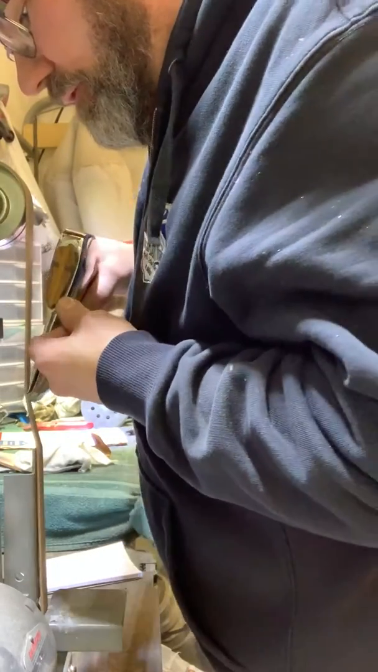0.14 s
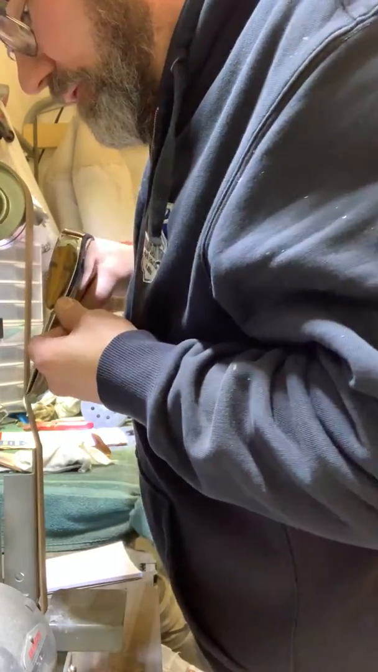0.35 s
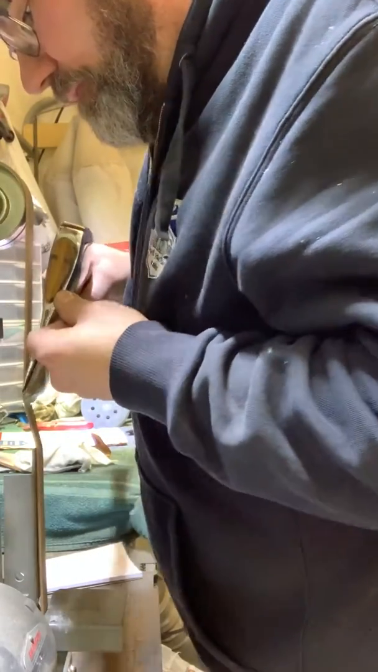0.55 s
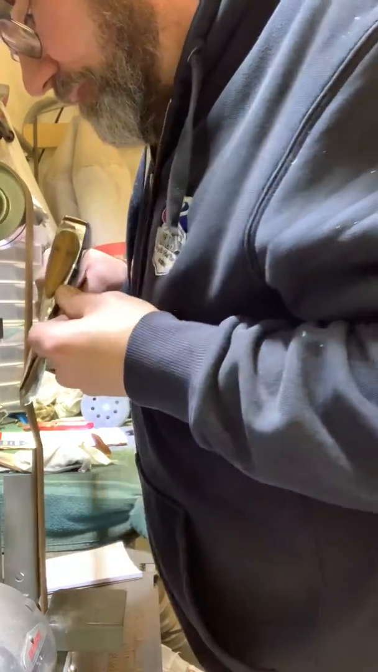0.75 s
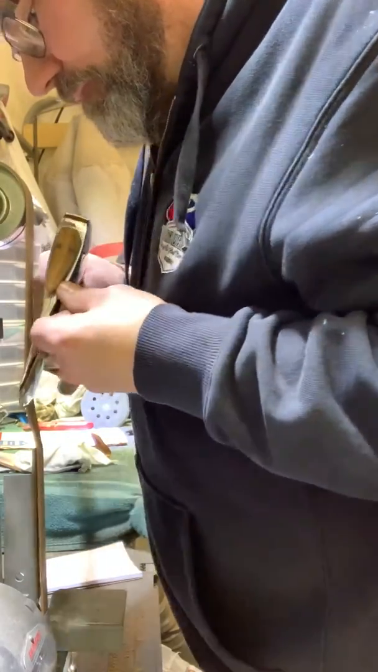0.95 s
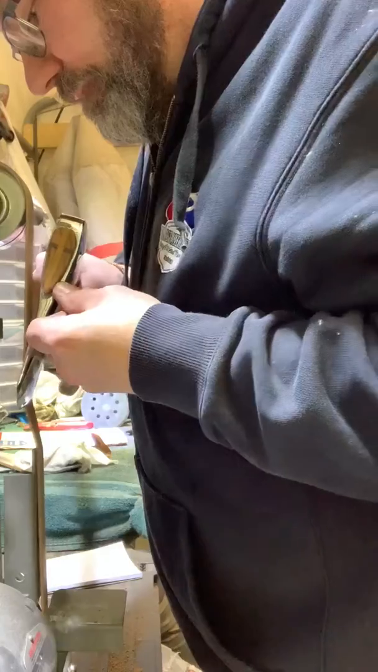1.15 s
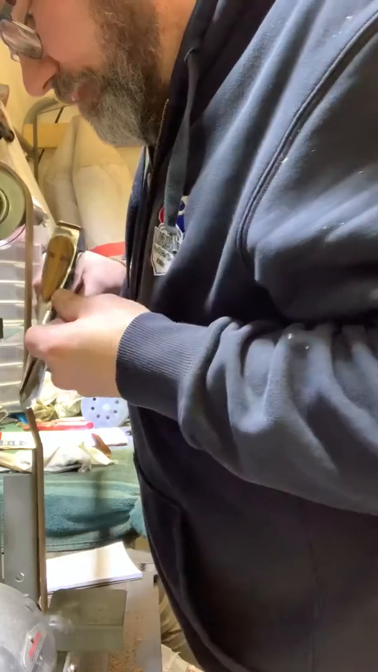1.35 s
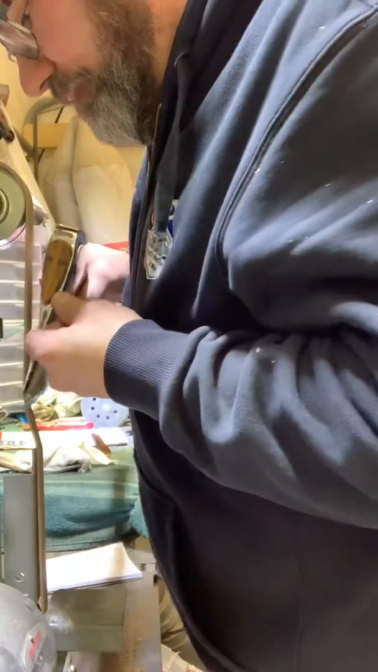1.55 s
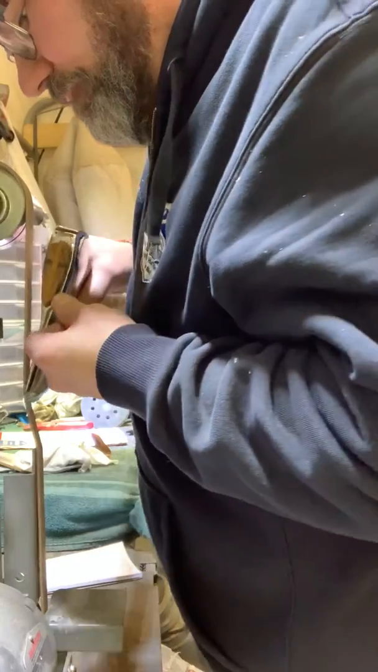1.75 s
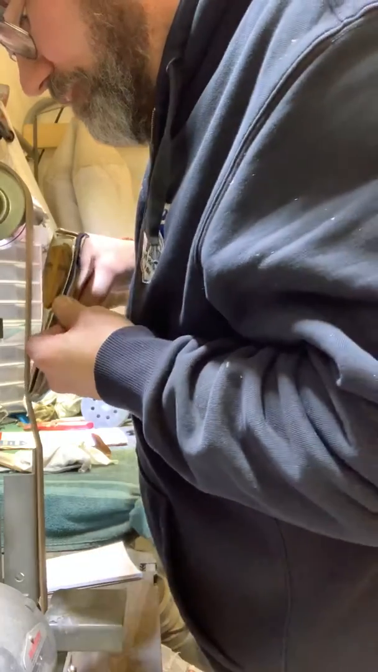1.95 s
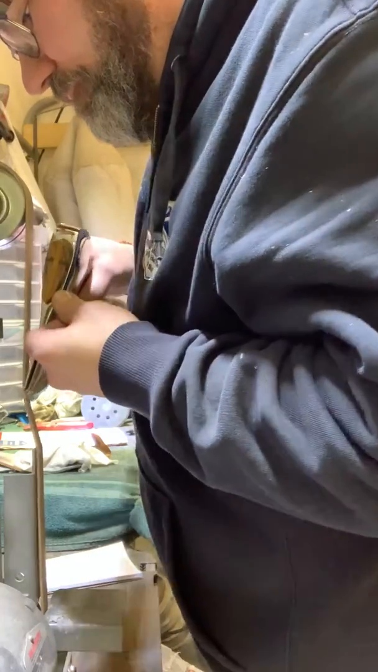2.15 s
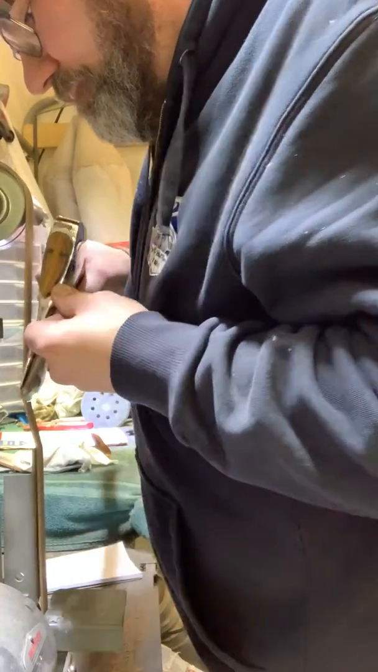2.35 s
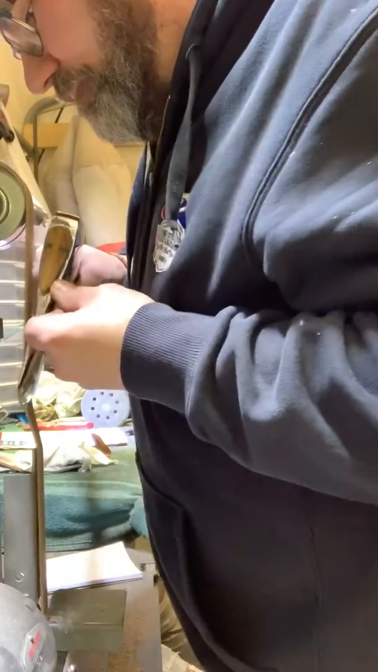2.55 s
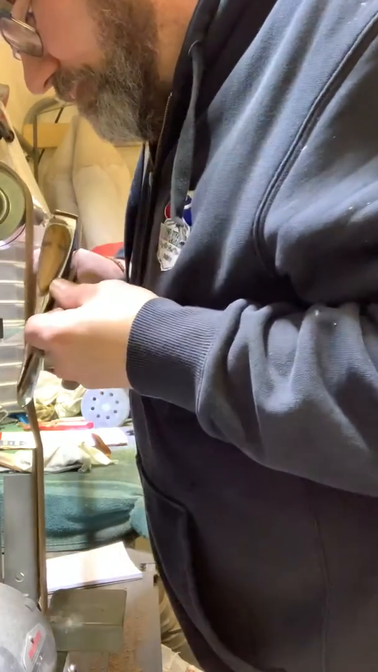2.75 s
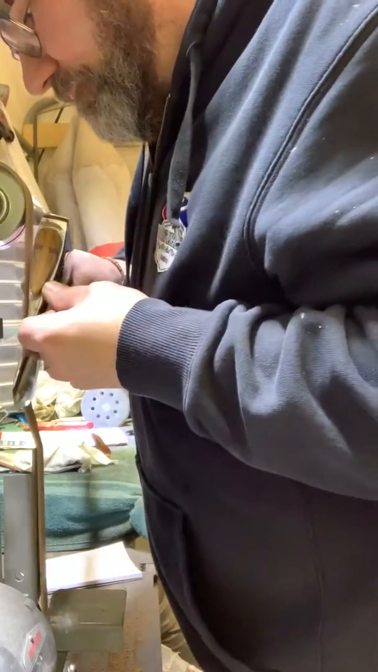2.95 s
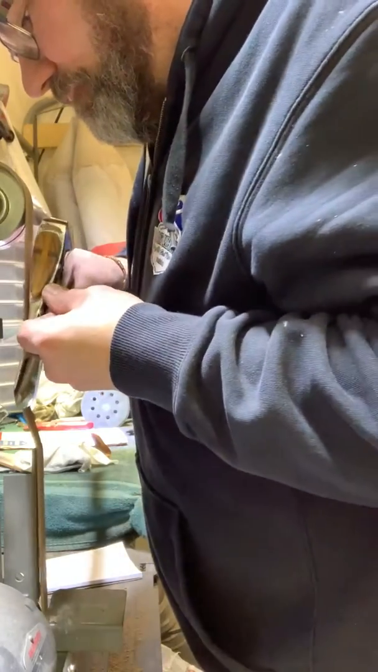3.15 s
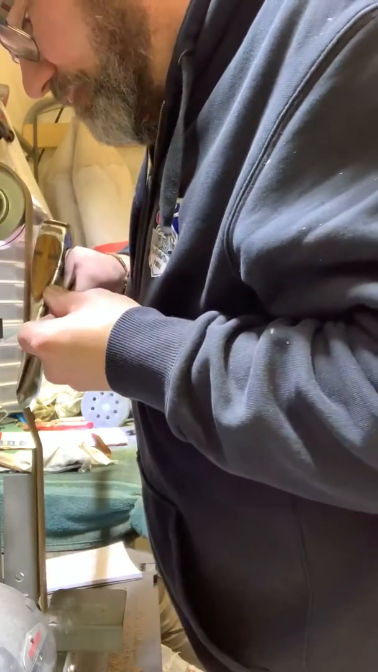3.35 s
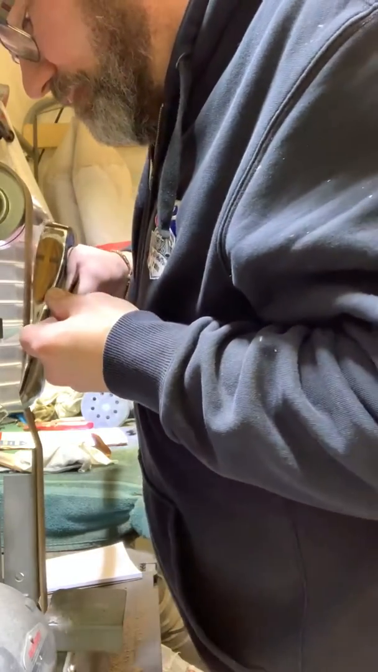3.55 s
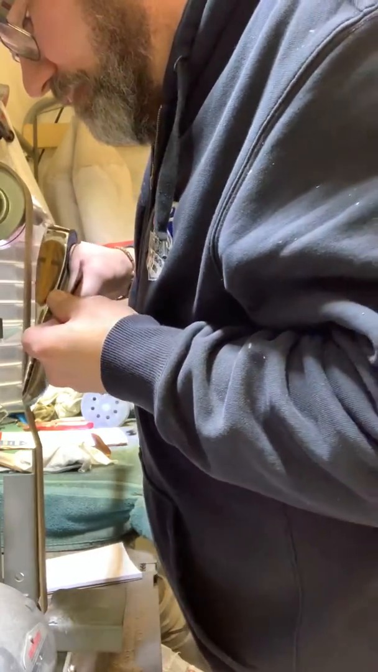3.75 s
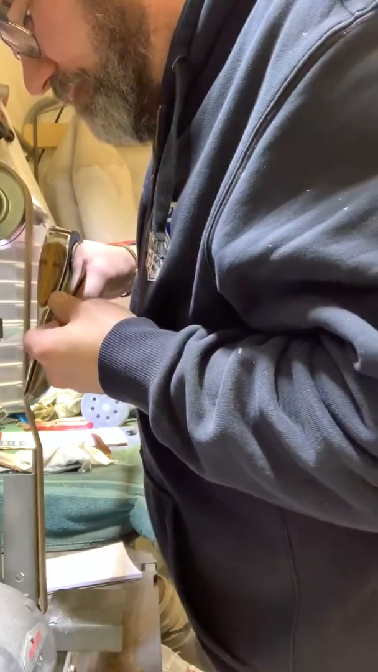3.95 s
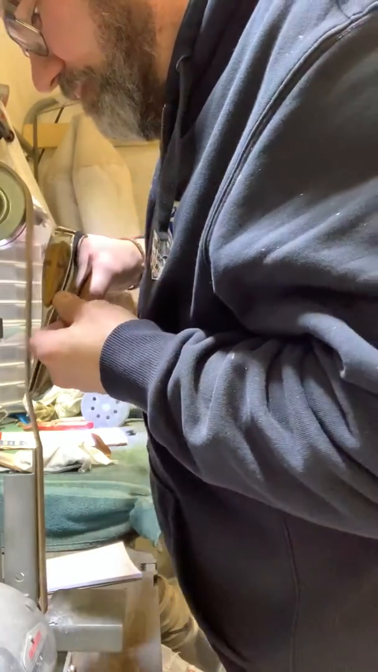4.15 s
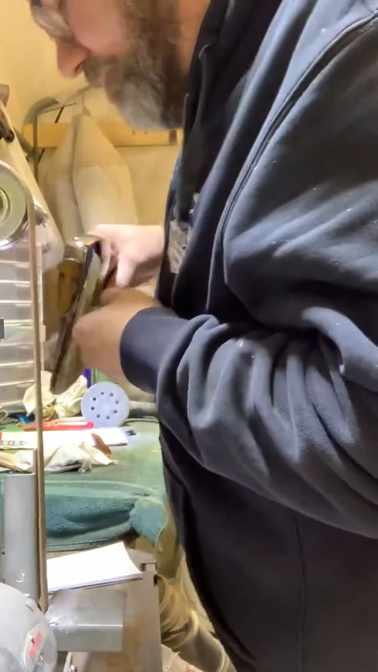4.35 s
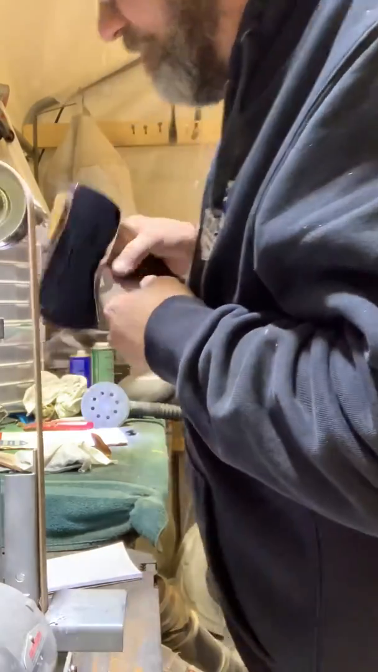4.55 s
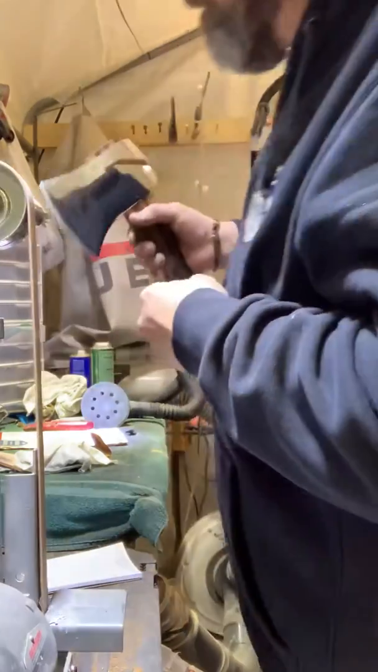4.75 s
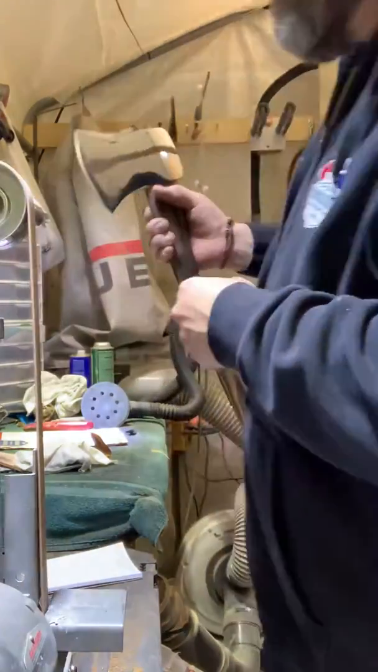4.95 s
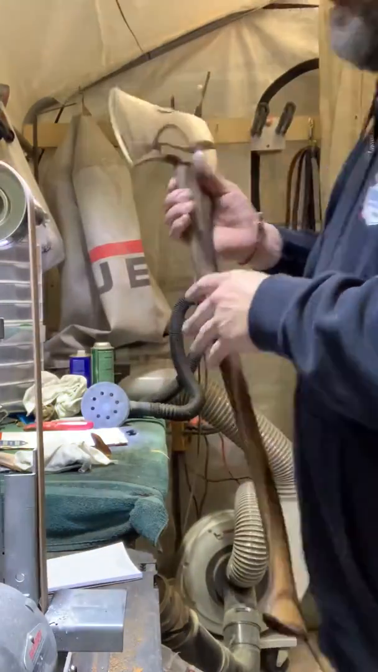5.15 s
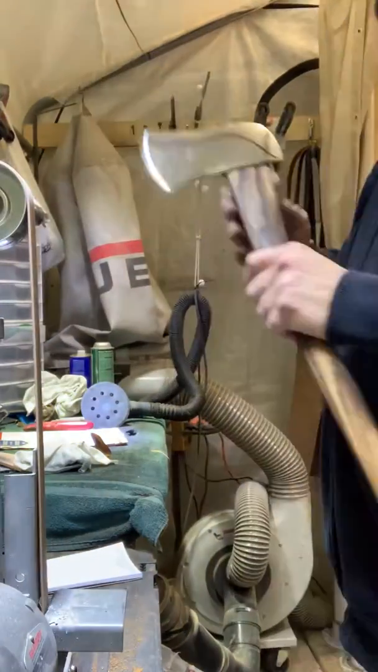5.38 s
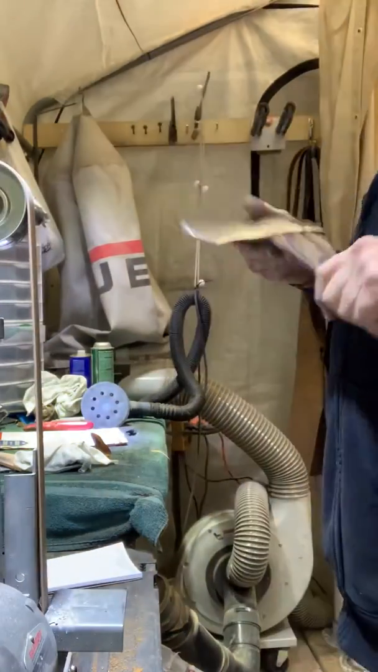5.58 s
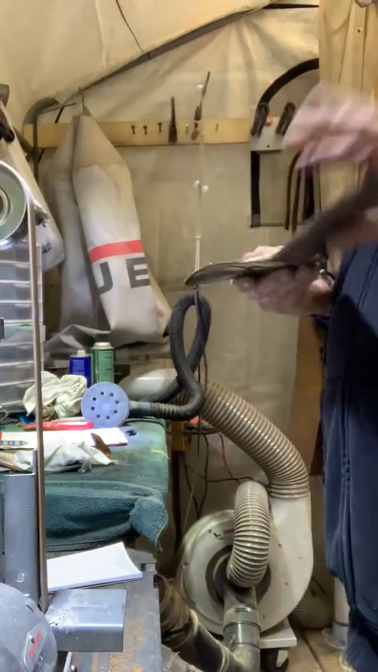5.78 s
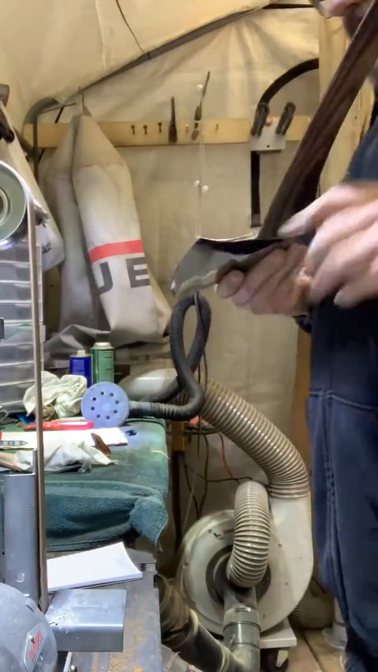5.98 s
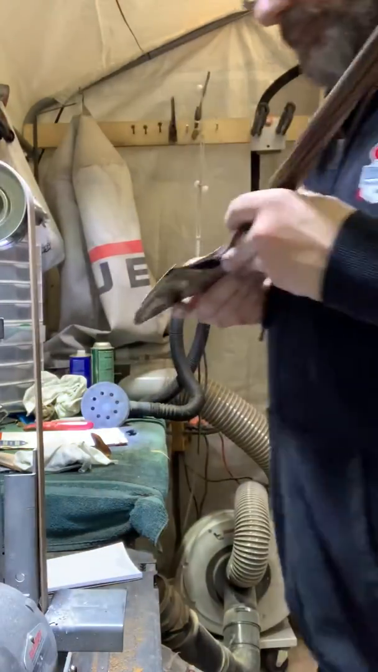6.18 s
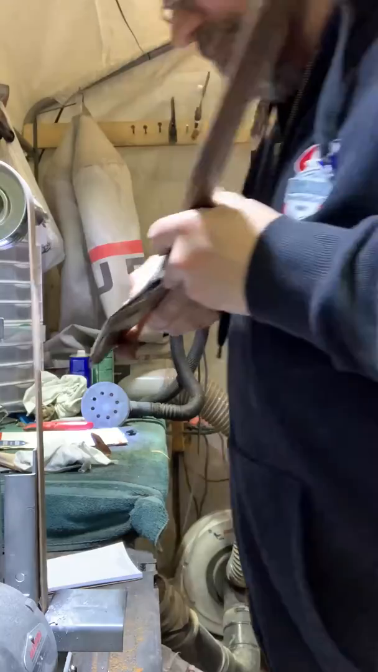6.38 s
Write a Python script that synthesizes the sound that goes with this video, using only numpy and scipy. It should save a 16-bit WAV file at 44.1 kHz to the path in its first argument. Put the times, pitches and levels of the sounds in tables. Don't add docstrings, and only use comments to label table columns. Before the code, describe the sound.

Stereo microphones close to one side of a sander in a small shed. A bright, slightly ringing hiss of axe steel on leather flutters eight or nine times a second over droning motor hum and beating frame rattle. Pressure eases and hardens, strongest before the lift near 4.2 seconds. Then the motor speeds up slightly, running freely with softer rattling, fan air and faint footfalls.

```python
import sys
import numpy as np
from scipy import signal
from scipy.fft import rfft, irfft, next_fast_len
from scipy.io import wavfile
from scipy.ndimage import map_coordinates

SR = 44100
rng = np.random.default_rng(int(sys.argv[2]) if len(sys.argv) > 2 else 0)


def volts_from_decibels(level):
    exponent = np.asarray(level, float) / 20
    return 10 ** exponent


def wrap_up_sound(samples):
    columns = np.atleast_2d(samples).T
    tamed = np.clip(columns, -1, 1)
    steps = np.round(tamed * 32767).astype(np.int16)
    wavfile.write(sys.argv[1], SR, steps)


N = 283122
T = np.arange(N) / SR
MAINS_HZ, BELT_HZ = 119.96, 8.64


def unit(x):
    return x / np.sqrt(np.mean(x ** 2) + 1e-20)


def noise():
    return rng.standard_normal(N)


def along(points, hz):
    f, v = np.transpose(points)
    return np.interp(np.log(hz + 1), np.log(f + 1), v)


def curve(points):
    s, v = np.transpose(points)
    return np.interp(T, s, v)


def wobble(rate, order=3):
    return map_coordinates(rng.standard_normal(int(N * rate / SR) + 4), [T * rate], order=order)


def filtered(x, response):
    m = next_fast_len(N + SR // 2)
    return irfft(rfft(x, m) * response(np.fft.rfftfreq(m, 1 / SR)), m)[..., :N]


def coloured(x, spectrum):
    return unit(filtered(x, lambda hz: volts_from_decibels(along(spectrum, hz))))


def ringing(x, modes):
    def response(hz):
        total = 0
        for k, (centre, width, db) in enumerate(modes):
            damping = 1j * hz * width
            total = total + (-1) ** k * volts_from_decibels(db) * damping / (centre ** 2 - hz ** 2 + damping)
        return total
    return unit(filtered(x, response))


def bump(turns, at, sharp):
    return np.exp(sharp * (np.cos(2 * np.pi * (turns - at)) - 1))


def tone(mains, shaft, turns):
    cycles = mains * MAINS_HZ * T + shaft * turns + rng.random()
    phase = 2 * np.pi * cycles + 0.19 * wobble(9, order=1)
    return np.sqrt(2) * volts_from_decibels(1.32 * wobble(12, order=1)) * np.sin(phase)


# mains_multiple, shaft_multiple, loaded_db, free_db
HUM_LINES = [(0, 2, -46, -52), (1, -1, -48, -48), (1, 0, -33.5, -32.5), (1, 1, -33, -36),
             (1, 2, -52.5, -48.5), (1, 3, -44, -46.5), (2, 2, -55, -51), (3, -1, -44, -65.5),
             (3, 0, -52, -46.5), (3, 1, -50.5, -45), (4, -1, -53, -57), (6, -1, -49, -62),
             (6, 0, -45, -45.5), (7, -1, -47, -51), (7, 0, -54.5, -56)]


def hum(turns, free):
    shake_db = 1.2 * (rattle(free) + 37) * free
    total = 0
    for mains, shaft, loaded_db, free_db in HUM_LINES:
        level_db = loaded_db + (free_db - loaded_db) * free + shake_db * (mains in (3, 4))
        total = total + volts_from_decibels(level_db) * tone(mains, shaft, turns)
    return total


# mains_multiple, shaft_multiple, level_db
BUZZ_LINES = [(2, -1, -8), (2, 0, 0.5), (2, 1, -7.5)]


def platen_buzz(turns, free):
    drift = 0.3 * wobble(14)
    buzz = 0
    for mains, shaft, db in BUZZ_LINES:
        buzz = buzz + volts_from_decibels(db) * np.sin(2 * np.pi * (mains * MAINS_HZ * T + shaft * turns) + drift)
    buzz_db = surges(column=2, rest_db=(-40, -42.5), free=free, rise_s=0.016, fall_s=0.04)
    flutter_db = 1.5 * wobble(16)
    return volts_from_decibels(buzz_db + flutter_db + 3.5) * buzz


def motor(turns, free):
    return hum(turns, free) + platen_buzz(turns, free)


# start_s, length_s, buzz_db, rattle_db
SURGE_ROWS = [(-0.05, .25, -30.5, -28.5), (0.512, 0.19, -30.5, -29), (.86, 0.33, -30.5, -30.5),
              (1.334, .26, -32, -28.5), (1.768, 0.37, -31.5, -28.5), (2.28, 0.26, -32, -29.5),
              (2.706, 0.34, -32, -29), (3.075, 0.24, -32, -27.5), (3.486, 0.19, -33, -27.5),
              (3.888, 0.28, -29.5, -28.5), (4.28, 0.22, -36, -34.5), (5.2, 0.35, -42, -34.5),
              (5.563, 0.36, -39, -35.5)]


def surges(column, rest_db, free, rise_s, fall_s):
    rest = rest_db[0] + (rest_db[1] - rest_db[0]) * free
    level = rest
    for row in SURGE_ROWS:
        start_s, length_s = row[0], row[1]
        rise = 1 + np.tanh((T - start_s) / rise_s)
        fall = 1 - np.tanh((T - start_s - length_s) / fall_s)
        level = level + rise * fall / 4 * (row[column] - rest)
    return level


def rattle(free):
    return surges(column=3, rest_db=(-35.5, -39), free=free, rise_s=0.072, fall_s=0.072)


def grain():
    return noise() * volts_from_decibels(1.6 * wobble(300, order=1) + 0.56 * wobble(40))


def worn_spots(turns, db):
    patches = rng.standard_normal(12)
    return volts_from_decibels(db * np.interp(turns, np.arange(12) / 12, patches, period=1))


# start_s, drag_db
EDGE_PRESSURE = [
    (0, -37),
    (.5, -37.5),
    (1.12, -40),
    (1.29, -34.5),
    (1.7, -37.5),
    (2.85, -39),
    (3.05, -34.5),
    (3.4, -32.5),
    (4.16, -37.5),
]
# pitch_hz, width_hz, level_db
HEAD_LOW = [(1575, 35, -6), (2220, 35, -9), (2690, 25, 3), (3260, 40, -11), (3480, 40, -10), (3750, 70, -3),
            (3878, 40, -2), (4135, 35, -6), (4845, 90, -2)]
# pitch_hz, width_hz, level_db
HEAD_HIGH = [(5640, 70, -7), (6185, 45, -6), (6870, 100, -7), (7195, 60, -8), (7431, 45, 0), (8416, 55, -1),
             (9261, 40, 0), (10226, 30, 1), (11040, 70, -11), (12420, 80, -10), (13050, 200, -12)]
# pitch_hz, density_db (per Hz)
LEATHER_HISS = [(800, -40), (1800, -6), (4000, 0), (6000, -5), (9500, -4), (11300, -8), (12600, -5),
                (14300, -13), (15600, -6)]


def axe():
    lift_s, lift_span_s = 4.144, 0.16
    lift_db = 20 * np.clip((T - lift_s) / lift_span_s, 0, 3) ** 2
    drag_db = curve(EDGE_PRESSURE) - lift_db
    low_db = -43.5 + 0.46 * (drag_db + 37)
    turns = BELT_HZ * T
    thick = volts_from_decibels(9 * bump(turns, 0.85, sharp=0.71) + 0.41 * wobble(9))

    hiss = coloured(grain() * thick * worn_spots(turns, db=-1.0), LEATHER_HISS)
    high = ringing(grain() * thick * worn_spots(turns, db=-2.5), HEAD_HIGH)
    low = ringing(grain() * thick ** 0.97 * worn_spots(turns, db=1.5), HEAD_LOW)

    ping_hz = 2447
    slap = bump(turns, 0.55, sharp=120) * volts_from_decibels(1.2 * wobble(9)) * np.sin(2 * np.pi * ping_hz * T)
    ping = ringing(unit(slap) * 0.13 + grain() * thick ** 0.6, [(ping_hz, 32, 0)])
    bright = volts_from_decibels(0.4) * hiss + volts_from_decibels(-0.8) * high
    body = volts_from_decibels(5.5) * low + volts_from_decibels(2) * ping
    return volts_from_decibels(drag_db) * bright + volts_from_decibels(low_db) * body


# pitch_hz, density_db (per Hz)
CASING_COLOUR = [(120, -18), (250, -4), (450, -5.5), (750, -4.5), (1100, -9), (2000, -23.5), (3100, -24.5),
                 (4400, -23), (9000, -47.5)]
# pitch_hz, width_hz, level_db
PANEL_MODES = [(290, 90, -3), (385, 70, -1), (560, 90, -4), (700, 60, 1), (840, 70, -1), (1050, 120, -8),
               (1400, 150, -11)]


def knocks(turns, free):
    pulls = np.floor(MAINS_HZ * T + 0.02 * wobble(60))
    at = np.flatnonzero(np.diff(pulls) > 0)
    luck_db = 1.35 * rng.standard_normal(len(at))
    blows = np.zeros(N)
    blows[at] = (0.75 + bump(turns[at], 0.0066, sharp=1.9)) * volts_from_decibels(luck_db)

    life = np.arange(700) / SR
    chatter = volts_from_decibels(-60 * life / 0.03) * (1 - np.exp(-life / 0.0008))
    burst = unit(signal.fftconvolve(blows, chatter)[:N] * noise())
    blows = unit(blows)
    casing = coloured(blows * 0.45 + burst, CASING_COLOUR)
    panels = ringing(blows * (0.21 + 0.33 * free) + burst, PANEL_MODES)
    return volts_from_decibels(-2.0) * casing + volts_from_decibels(-9.0) * panels


def shaft_tick(turns):
    return ringing(noise() * bump(turns, 0.5, sharp=77) * volts_from_decibels(2.8 * wobble(30)), [(3000, 1400, 0)])


# pitch_hz, width_hz, level_db
IDLER_MODES = [(98.7, 5, 3), (1580, 30, -13), (2466, 25, -11), (3480, 40, -15), (3880, 60, -15),
               (4850, 20, -11), (7430, 40, -23), (10050, 200, -30), (12700, 500, -30)]


def idler(turns):
    return ringing(noise() * (0.6 + bump(turns, 0.0086, sharp=1.6)), IDLER_MODES)


# pitch_hz, density_db (per Hz)
AIR_COLOUR = [(60, -18), (200, -4.5), (500, -1), (850, -10.5), (1200, -8.5), (2000, -15), (3200, -17),
              (4500, -18), (6000, -25), (10000, -30), (13000, -35.5), (15600, -32.5)]


def fan_air():
    return coloured(noise() * volts_from_decibels(0.48 * wobble(14)), AIR_COLOUR)


# start_s, level_db
FOOTSTEPS = [(.02, -46), (.95, -42), (1.45, -52), (2.75, -40), (3.19, -44), (3.54, -50), (4.17, -52),
             (4.38, -41), (4.54, -41), (4.7, -48), (6.35, -43.5)]


def floor_rumble():
    ground = volts_from_decibels(-61) + sum(volts_from_decibels(db) * np.exp(-abs(T - s) / 0.047) for s, db in FOOTSTEPS)
    rumble = coloured(noise(), [(15, -43), (35, -15), (52, -4), (70, 1), (110, -36), (300, -93)])
    return volts_from_decibels(3.0) * ground * rumble


def frame(turns, free):
    rattle_db = rattle(free) + 0.73 * wobble(8)
    air_db = -35 - 0.46 * free + 0.17 * (rattle_db + 37.0)
    steel = volts_from_decibels(rattle_db - 1.5) * (knocks(turns, free) + volts_from_decibels(-15.0) * shaft_tick(turns))
    return steel + volts_from_decibels(-44.0) * idler(turns) + volts_from_decibels(air_db) * fan_air() + floor_rumble()


# pitch_hz, likeness (0-1)
PORT_LIKENESS = [(20, 1), (80, 1), (150, 1), (300, 0.79), (450, 0.5), (750, 0.53), (1100, 0.5),
                 (1500, 0.54), (2100, 0.5), (2450, 0.96), (3200, 0.55), (4000, 0.93), (15000, 1)]
# pitch_hz, lead_rad
PORT_LEAD = [(60, 0.1), (130, 0), (300, 0.42), (500, 0.54), (1000, 0.96), (1400, 3.31), (2000, 0),
             (16000, 0.0571)]
# pitch_hz, lean_db
PORT_LEAN = [(150, -0.5), (330, 0.7), (600, 4), (800, 4.5), (1050, 0.5), (2400, 1), (4000, 0.5)]


def ports(x, hum):
    life = np.arange(SR // 3) / SR
    tail = rng.standard_normal(len(life)) * volts_from_decibels(-60 * life / 0.6)
    diffuse = signal.fftconvolve(x, tail / np.linalg.norm(tail))[:N]

    def spread(hz):
        angle = np.arccos(np.clip(along(PORT_LIKENESS, hz), 0, 1)) / 2
        return np.array([np.cos(angle), np.sin(angle)])

    def offset(hz):
        lag_s = 5.15 / 44100
        phase = along(PORT_LEAD, hz) - 2 * np.pi * hz * lag_s
        half = volts_from_decibels(along(PORT_LEAN, hz) / 2) * np.exp(0.5j * phase)
        return np.array([half, 1 / half])

    mid, side = filtered(np.array([x, diffuse]), spread)
    return filtered(hum + np.array([mid + side, mid - side]), offset)


# start_s, speed_hz
SHAFT_SPEED = [
    (0, 29.44),
    (4.2, 29.44),
    (4.35, 29.89),
    (6.42, 29.89),
]


def scene():
    speed = curve(SHAFT_SPEED)
    turns = 0.26 + np.cumsum(speed) / SR
    free = (speed - speed.min()) / np.ptp(speed)
    return ports(axe() + frame(turns, free), motor(turns, free))


# pitch_hz, under_db
WEAKER_LIMIT = [(3450, -30), (3900, -8), (5300, -7.5), (8000, -7.5), (13000, -4.5)]
# pitch_hz, under_db
FAINT_LIMIT = [(500, -21), (1200, -9), (2500, -7.5), (5000, -11.5), (9000, -9.5), (14000, -9)]


def thinned(dry):
    hz, _, z = signal.stft(np.array([dry[0] + dry[1], dry[0] - dry[1]]) / 2, SR, nperseg=2048)
    bins = 24
    band = np.arange(len(hz)) // bins
    power = np.add.reduceat(abs(z) ** 2, np.arange(0, len(hz), bins), axis=1) / bins
    size = np.sqrt(power)[:, band]
    luck = volts_from_decibels(1.8 * rng.standard_normal(size.shape)[:, band * bins])
    partner = volts_from_decibels(along(WEAKER_LIMIT, hz))[:, None] * size[::-1]
    floor = volts_from_decibels(-86) * (hz > 14200)[:, None]
    keep = size * luck > np.maximum(partner, floor)
    keep &= abs(z) > volts_from_decibels(along(FAINT_LIMIT, hz))[:, None] * size.max(axis=0)
    keep &= (hz < 15760)[:, None]
    mid, side = signal.istft(z * keep, SR, nperseg=2048)[1][:, :N]
    return np.array([mid + side, mid - side])


def roll_off(x):
    return signal.sosfilt(signal.butter(12, 15940, fs=SR, output="sos"), x)


def record(dry):
    mix = thinned(dry)
    return roll_off(mix)


dry = scene()
out = record(dry)
wrap_up_sound(out)
```